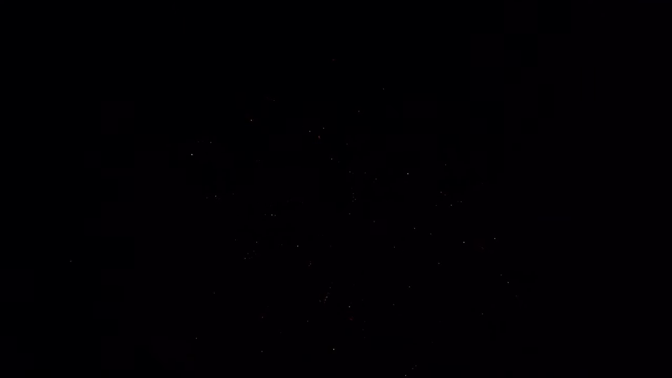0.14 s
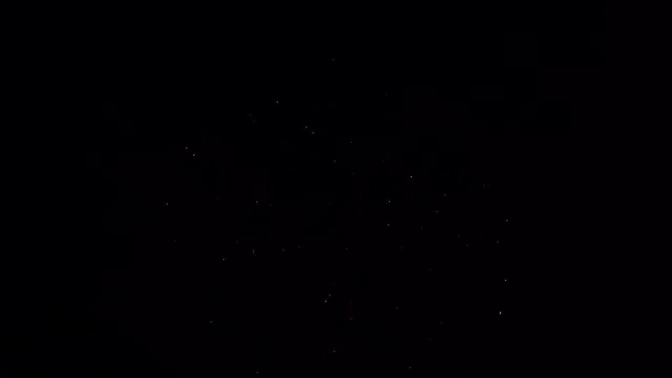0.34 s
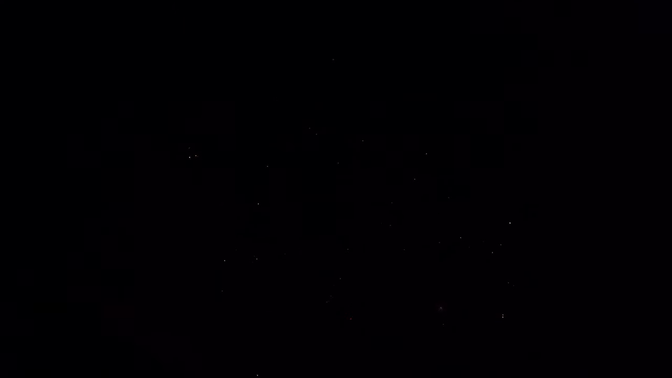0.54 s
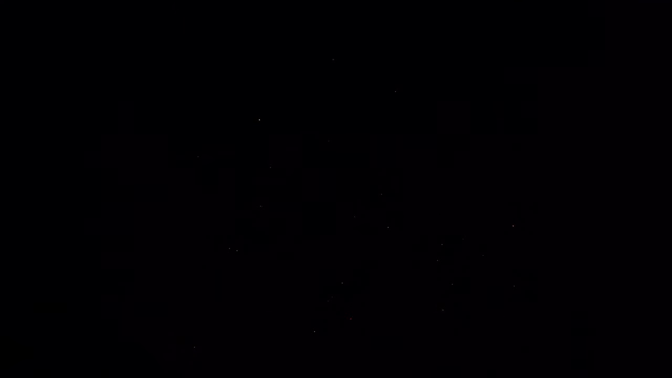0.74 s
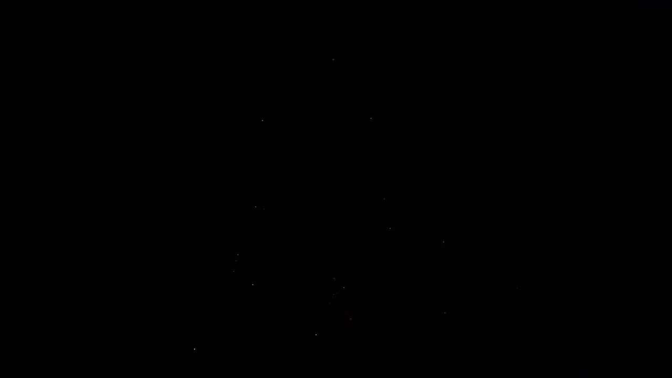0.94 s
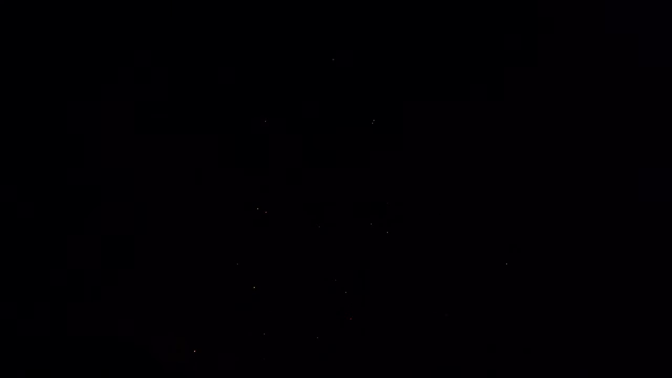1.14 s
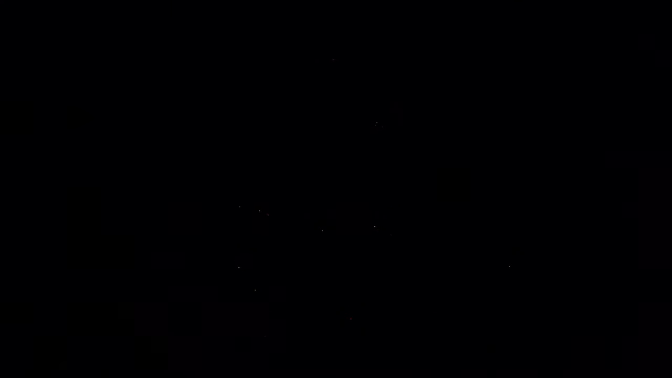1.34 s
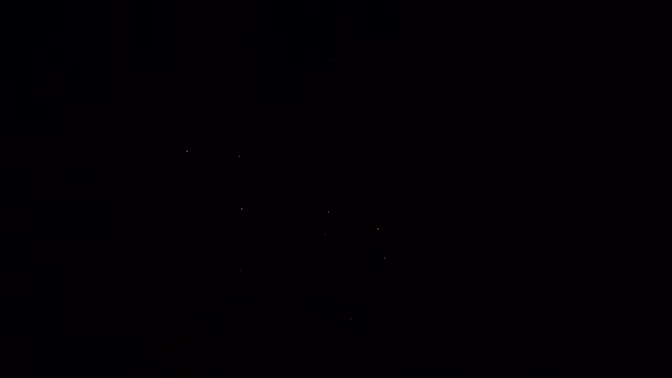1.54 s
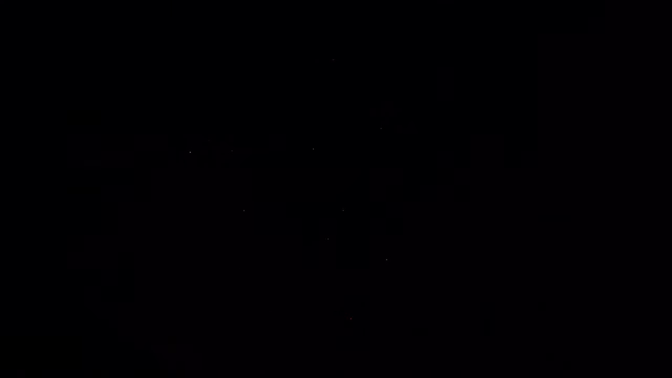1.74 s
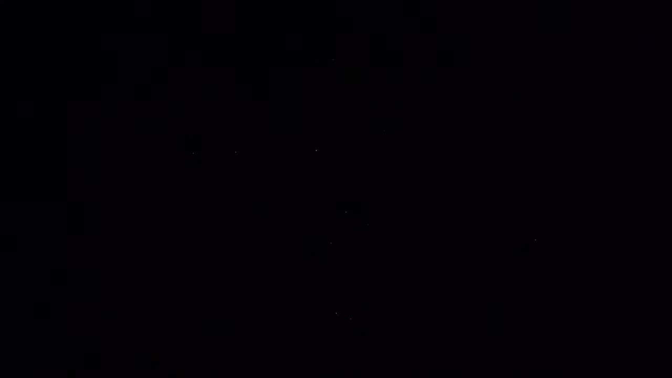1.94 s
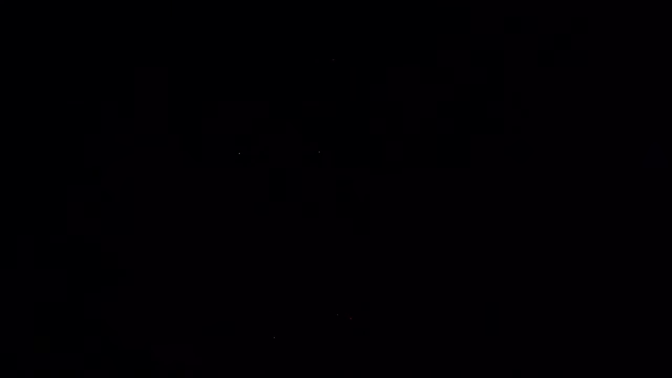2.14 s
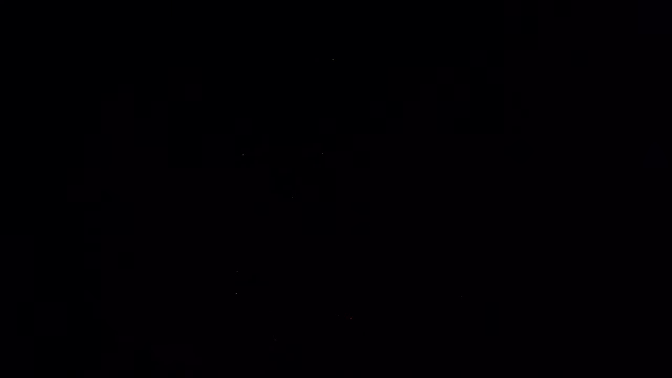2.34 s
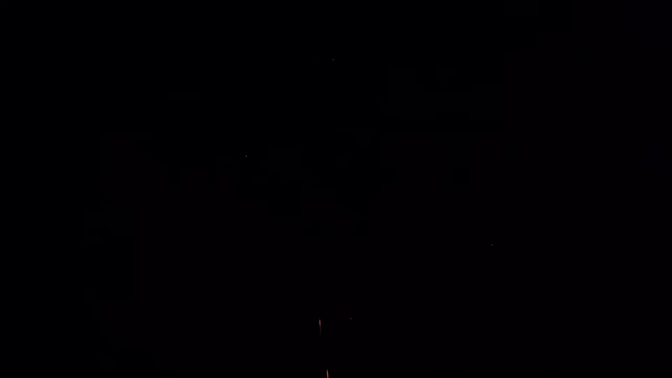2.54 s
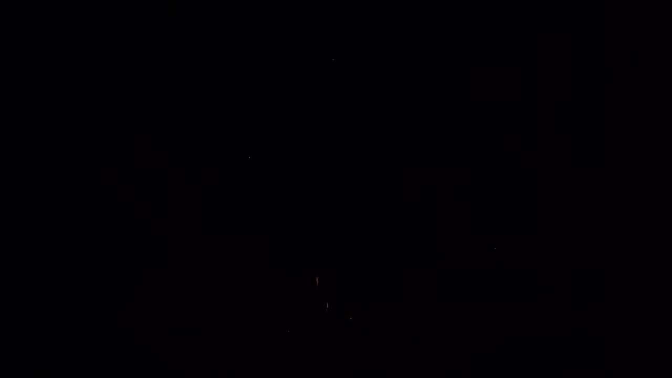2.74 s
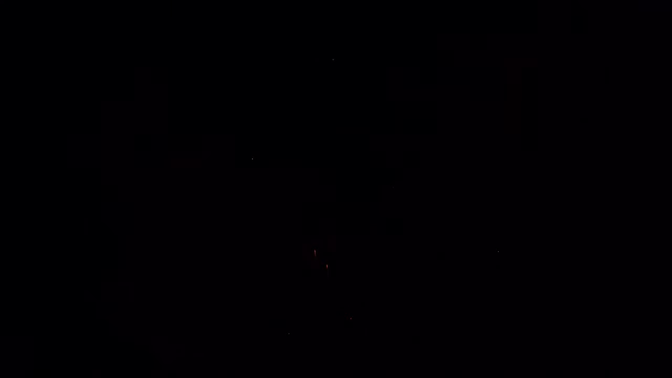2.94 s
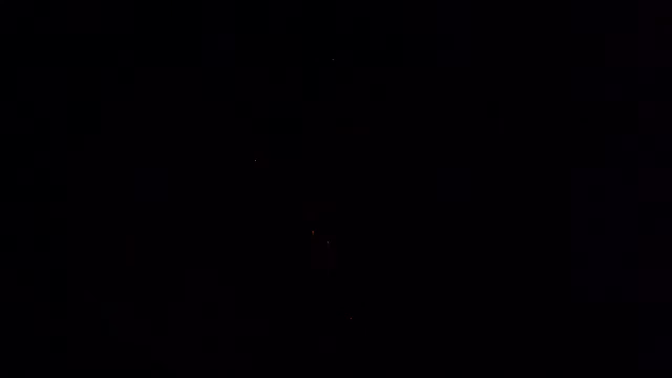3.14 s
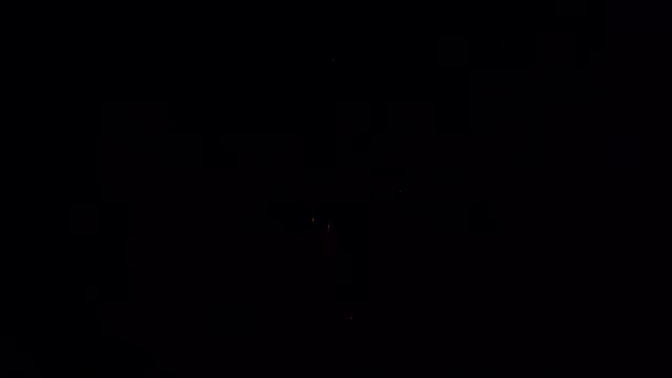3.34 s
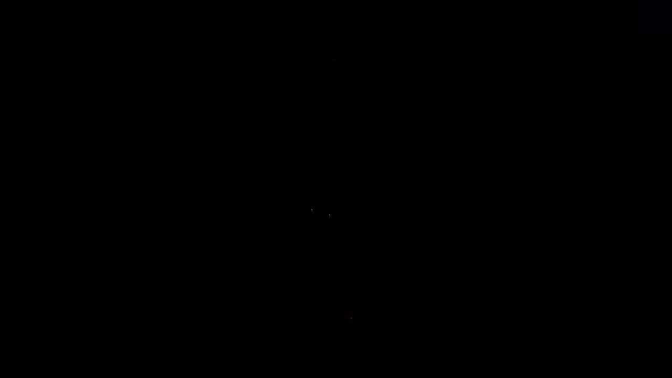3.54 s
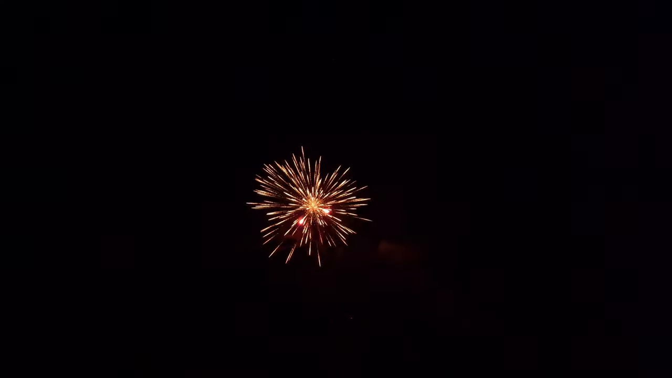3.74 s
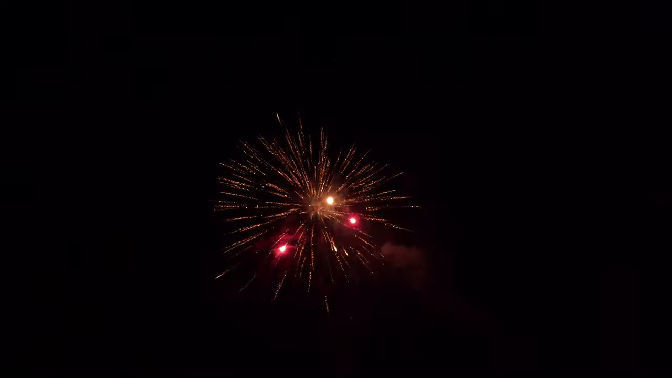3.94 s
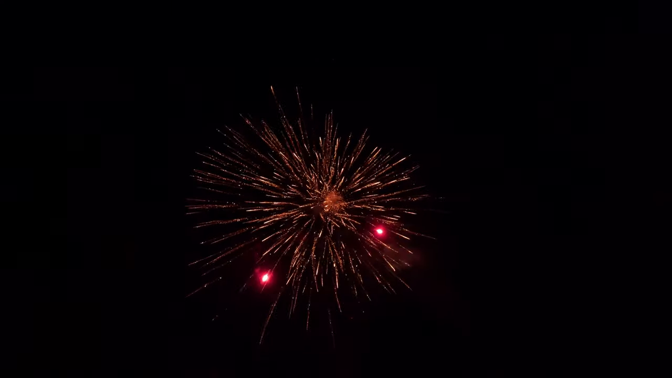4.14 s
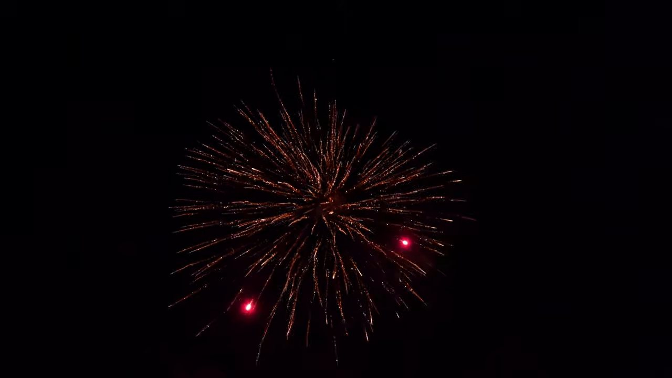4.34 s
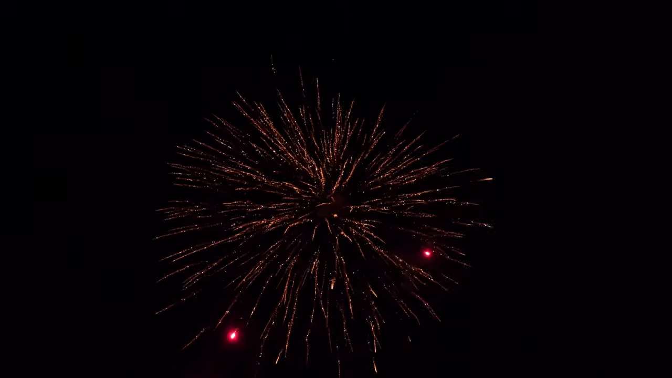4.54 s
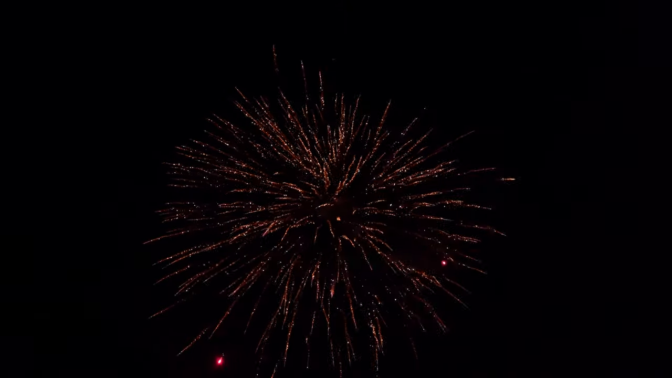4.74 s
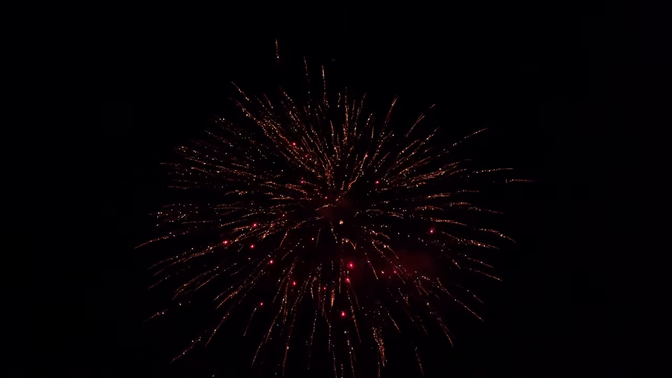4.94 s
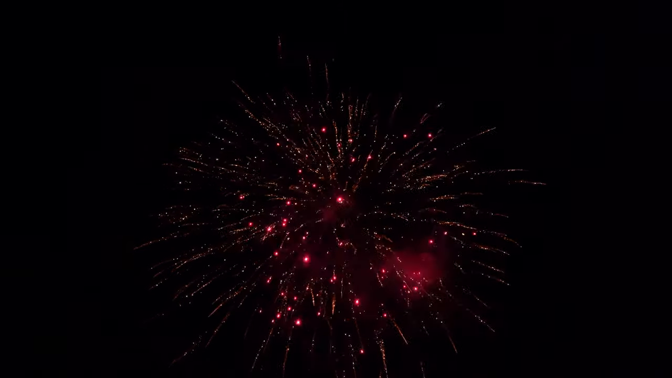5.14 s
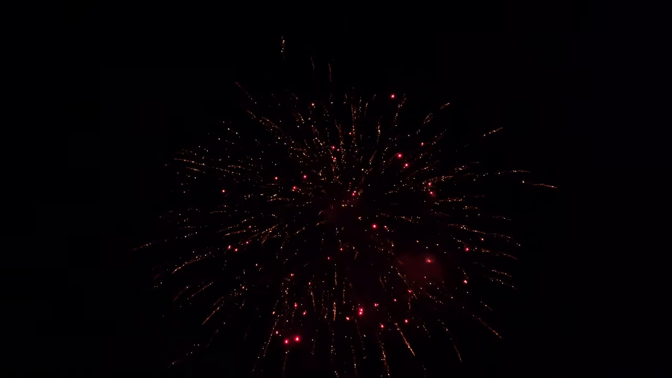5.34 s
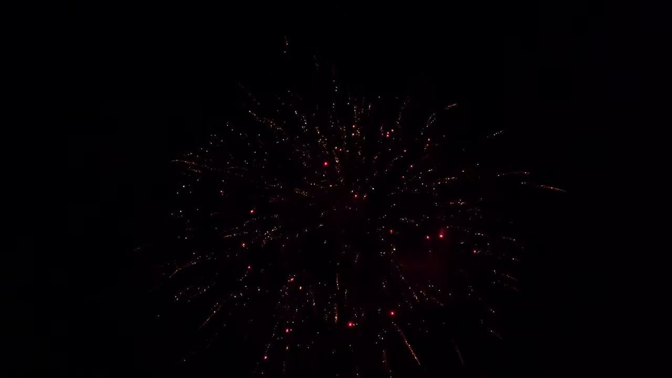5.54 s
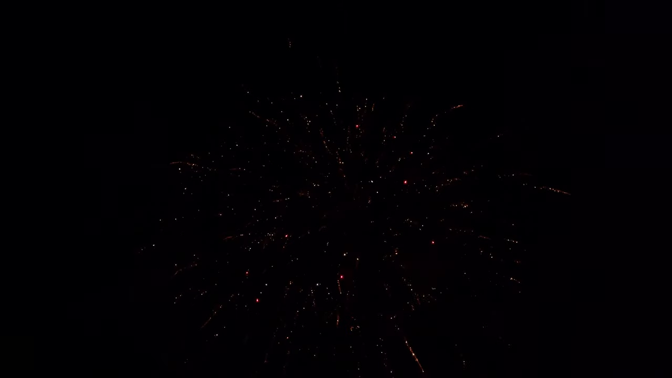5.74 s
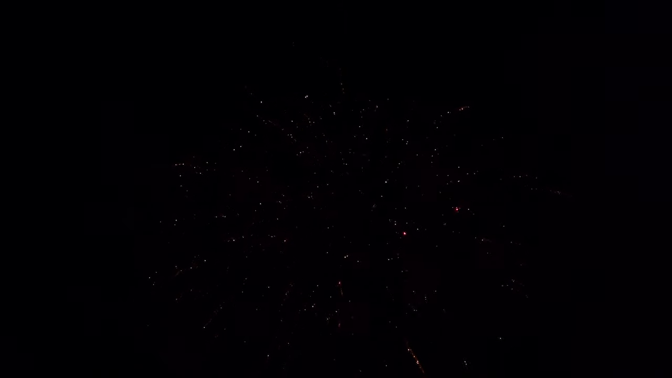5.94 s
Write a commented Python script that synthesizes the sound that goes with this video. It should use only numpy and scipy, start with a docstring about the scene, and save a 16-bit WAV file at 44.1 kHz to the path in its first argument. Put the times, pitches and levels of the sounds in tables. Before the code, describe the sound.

Outdoors at night, low distant rumble, soft air noise, cricket chirps and a rattling frog trill, answered by a slightly lower frog. A nasal fuse snap comes just before two seconds, then a heavy mortar launch and a weaker one. After a tense gap a huge bang cracks overhead, followed by a smaller thump. Echoes roll off the slopes; the microphone overloads on the blasts.

```python
"""Night over open ground: rumble, hum, air noise and insects, then one frog trills and a lower one follows.
Nearly 2 s in a fuse pops, a nasal noise burst; two mortar launches follow and, later, two bursts overhead.
Each blast is shock fronts, a burst of bright flame noise and ringing low modes; slopes return it as banded noise.
That echo rolls on, each band dying at its own rate, and late stars sizzle near the end.
At the microphone a look-ahead limiter and overload squash the blasts; the treble differs a little left to right."""
import sys
import numpy as np
from scipy import signal
from scipy.fft import rfft, irfft
from scipy.io import wavfile
from scipy.ndimage import uniform_filter1d, minimum_filter1d

SR = 44100
rng = np.random.default_rng(int(sys.argv[2]) if len(sys.argv) > 2 else 0)


def to_wav(s):
    """Save 16-bit WAV."""
    ch = np.atleast_2d(s).T  # columns
    pcm = np.round(np.clip(ch, -1, 1) * 32767)  # PCM
    wavfile.write(sys.argv[1], SR, pcm.astype(np.int16))


N = 263574
T = np.arange(N) / SR


def amp(db):
    """Decibels to gain."""
    return 10 ** (np.asarray(db) / 20)


def rms_one(x):
    """Scale to rms 1."""
    return x / np.sqrt(np.mean(x ** 2) + 1e-20)


def at_hz(points, hz):
    """Read the level or decay time of a curve on a log-frequency axis."""
    curve = np.array(points)
    return np.interp(np.log(hz), np.log(curve[:, 0]), curve[:, 1])


def resonate(x, modes):
    """Parallel resonances (f/Hz, width/Hz, level/dB), signs alternating."""
    out = 0
    for k, (hz, width, level_db) in enumerate(modes):
        r = np.exp(-np.pi * width / SR)
        b = [(1 - r * r) / 2, 0, (r * r - 1) / 2]
        a = [1, -2 * r * np.cos(2 * np.pi * hz / SR), r * r]
        out = out + (-1) ** k * amp(level_db) * signal.lfilter(b, a, x)
    return out


def bands():
    """Fifth-octave bands of white noise with their centres; neighbours are unrelated; run in."""
    edges = 22 * 2 ** np.arange(0, 9.7, 1 / 5)
    white = rng.standard_normal((2, N + SR // 4))
    for k, (low, high) in enumerate(zip(edges, edges[1:])):
        band_pass = signal.butter(3, [low, high], "band", fs=SR, output="sos")
        yield np.sqrt(low * high), signal.sosfilt(band_pass, white[k % 2])[-N:]


def drift(per_s, size, step):
    """Slow chance at every step-th sample; spread 1."""
    r = np.exp(-2 * np.pi * per_s * step / SR)
    chance = rng.standard_normal(size + 500)
    return rms_one(signal.lfilter([1], [1, -2 * r, r * r], chance)[500:])


def swell(age, level_db, rise, hold, fall_db_per_s):
    """Rise, hold, then a steady fall in dB."""
    fall_db = fall_db_per_s * np.clip(age - rise - hold, 0, 6)
    return np.clip(age / rise, 0, 1) * amp(level_db - fall_db)


def returns(age, rows):
    """Power of overlapping swells, each after its delay."""
    return sum(swell(age - delay, *shape) ** 2 for delay, *shape in rows)


# the blasts: (t/s, thump level/dB, thump length/s, thump pitch factor, flame crack level/dB, crack length/s,
# echo level/dB, place: 0 = on the ground, 1 = in the sky)
BLASTS = [(2.19, 8.5, 0.03, 0.93, 5, 0.013, -2, 0), (2.399, -4, 0.032, 0.82, -1.5, 0.0084, -3, 0),
          (3.8652, 16, 0.031, .88, -9, 0.0242, 0.5, 1), (4.2092, -1, 0.066, 0.84, -44.5, 0.011, -1.5, 1)]
# low background, earlier and later shells rolling round the hills: (t/s, distant rumble level/dB, hum level/dB)
BACKGROUND = [(0, -23, -37.5), (1, -29, -37.5), (2.1, -32.5, -36.5), (2.8, -35, -33.5), (3.4, -37.5, -40),
              (3.8, -33.5, -36), (4.1, -26, -50), (4.599, -24.5, -34.5), (5.3, -22.5, -43),
              (5.98, -19, -36)]
# late stars sizzle: (t/s, level/dB, rise/s, hold/s, fall/(dB/s))
STARS = (5.17, -61.5, .13, .24, 22)
# how far air noise and hiss sink: [after a launch/dB, after a burst/dB]
AIR_SINK_DB = [15, 16]
HISS_SINK_DB = [10, 17]
AIR_DB, HISS_DB = -42, -63.5
OPENING_DB, OPENING_S = 2.5, 0.62   # both start louder, under the last echo of an earlier shell
SINK_S, SUNK_S, RETURN_S = .3, .72, .45   # time going down, staying down, coming back


def night(t):
    """Powers of distant rumble, hum, air noise and hiss at times t; the last two sink after each blast."""
    s, rumble_db, hum_db = np.transpose(BACKGROUND)
    starts = np.array([blast[0] for blast in BLASTS])[:, None]
    sky = np.array([round(blast[-1]) for blast in BLASTS])[:, None]
    since = t - starts
    sunk = np.clip(np.minimum(since / SINK_S, 1 - (since - SINK_S - SUNK_S) / RETURN_S), 0, 1)
    opening_db = OPENING_DB * np.clip(1 - t / OPENING_S, 0, 1)
    air_db = AIR_DB + opening_db - (np.array(AIR_SINK_DB)[sky] * sunk).max(axis=0)
    hiss_db = HISS_DB + opening_db - (np.array(HISS_SINK_DB)[sky] * sunk).max(axis=0)
    levels_db = [np.interp(t, s, rumble_db), np.interp(t, s, hum_db), air_db, hiss_db]
    rumble, hum, air, hiss = amp(2 * np.array(levels_db))
    return rumble, hum, air, hiss + returns(t, [STARS])


# relative spectra of the night's layers: (f/Hz, level/dB per Hz)
RUMBLE_COLOUR = [(41, -47), (70, -13.5), (102, -3.5), (200, 3), (305, 1), (446, -8.5), (679, -8),
                 (792, -15.5), (951, -12.5), (2000, -35), (2600, -40), (4400, -120)]
HUM_COLOUR = [(13, -43), (22, -13), (38, -12.5), (54, -1.5), (86, 2.5), (110, -2.5), (140, -23),
              (240, -120)]
AIR_COLOUR = [(300, -19), (500, -18), (800, -4.5), (1200, -1.5), (2000, -2), (2800, -7), (4000, -16.5),
              (6000, -25.5), (9000, -57)]
HISS_COLOUR = [(3000, -21), (5500, -3), (8000, -4.5), (12000, -9.5), (15500, -14), (16300, -19)]
# relative spectra of the echo of a launch and of a burst: (f/Hz, level/dB per Hz)
GROUND_COLOUR = [(24, -41), (40, -33), (60, -29), (167, 6.5), (269, -2), (433, -33.5), (529, -8.5),
                 (630, -18.5), (790, -13.5), (1040, -17), (1180, -16), (2440, -11.5), (12800, -47.5),
                 (16000, -53)]
SKY_COLOUR = [(24, -77), (40, -45.5), (69, -31), (91, -6), (237, 0), (290, 3.5), (329, 0.5), (479, -11.5),
              (1070, -18), (1210, -20), (2500, -16), (7170, -40.5), (11000, -46.5), (16000, -59)]
# returns from near walls, slopes and far hills: (delay/s, level/dB, rise/s, hold/s, fall/(dB/s))
GROUND_ECHO = [(.012, 11, 0.009, 0.011, 904), (.042, -0.5, 0.017, .01, 60), (.08, 2, .03, .03, 44),
               (.33, -0.5, 0.13, 0.1, -1.5)]
SKY_ECHO = [(.001, 6.5, 0.012, 0.016, 520), (.03, 0.5, 0.0063, 0.013, 140), (0.0616, 3, 0.0022, .05, 26),
            (.24, 0.9, 0.18, 0.25, 0.75)]
# further decay of the echo, band by band: (f/Hz, time to lose 60 dB/s)
GROUND_T60 = [(60, 6.5), (200, 0.63), (500, 4.8), (1000, 6.5), (2500, 2.99), (5000, 1.87), (9000, 1.45),
              (15000, 1.2)]
SKY_T60 = [(60, 0.69), (300, 1.17), (1000, 15), (2500, 4.9), (4500, 2.5), (6500, 2.24), (9000, 1.52),
           (15000, 1.2)]
ECHO_DB = -16   # added to every return
ROLL_DB, ROLL_PER_S = .6, 9   # uneven terrain makes the echo roll


def echoes_and_night():
    """Countless far reflections blur into noise; each band dies at its own rate over the background."""
    step = 32
    coarse = T[::step]
    bank, background = list(bands()), night(coarse)
    heard = [returns(coarse - s, SKY_ECHO if sky else GROUND_ECHO) for s, *_, sky in BLASTS]
    layers = (GROUND_COLOUR, SKY_COLOUR, RUMBLE_COLOUR, HUM_COLOUR, AIR_COLOUR, HISS_COLOUR)
    totals = [sum(amp(2 * at_hz(colour, hz)) * np.var(band) for hz, band in bank) for colour in layers]
    out, shared_roll = np.zeros(N), drift(ROLL_PER_S, len(coarse), step)
    for hz, band in bank:
        roll_db = ROLL_DB * (shared_roll + .6 * drift(ROLL_PER_S, len(coarse), step))
        shares = [amp(2 * at_hz(colour, hz)) / total for colour, total in zip(layers, totals)]
        power = sum(share * level for share, level in zip(shares[2:], background))
        for (s, *_, echo_db, sky), returned in zip(BLASTS, heard):
            age = np.maximum(coarse - s, 0)
            loss_db = 60 * age / at_hz(SKY_T60 if sky else GROUND_T60, hz)
            power += shares[round(sky)] * returned * amp(2 * (ECHO_DB + echo_db + roll_db - loss_db))
        out += band * np.interp(T, coarse, np.sqrt(power))
    return out


def katydid():
    """A faint, far insect buzz, twice-resonated noise, that soon fades."""
    buzz = [(5700, 450, 0)]   # f/Hz, width/Hz, level/dB
    tone = rms_one(resonate(resonate(rng.standard_normal(N), buzz), buzz))
    return swell(T, level_db=-66, rise=0.011, hold=.6, fall_db_per_s=25) * tone


# cricket chirps: (t/s, level/dB)
CHIRPS = [(.094, -54), (.479, -54), (.884, -54), (1.267, -52.5), (1.64, -53), (3.62, -58)]
# wing strokes of a chirp: (delay/s, level/dB re chirp)
STROKES = [(0, 0), (0.044, 2), (.1, 0.5)]
STROKE_S, STROKE_FROM_HZ, STROKE_TO_HZ = .024, 4950, 4380


def cricket():
    """Each wing stroke is a short, slightly rough tone falling in pitch, with a soft echo."""
    out, n = np.zeros(N), int(STROKE_S * SR)
    cycles = np.cumsum(np.linspace(STROKE_FROM_HZ, STROKE_TO_HZ, n)) / SR
    stroke = np.hanning(n) ** 0.41 * np.sin(2 * np.pi * cycles)
    for s, chirp_db in CHIRPS:
        for delay, stroke_db in STROKES:
            out[round((s + delay) * SR):][:n] += amp(chirp_db + stroke_db) * stroke
    out *= 1 + .25 * rms_one(uniform_filter1d(rng.standard_normal(N), size=90))   # roughness
    return out + amp(-5) * np.roll(out, int(0.017 * SR))


# frog trills, one a frog: (t/s, level/dB, rise/s, hold/s, throb depth 0-1)
TRILLS = [(0.102, -31, 0.013, 0.53, 0.61), (1.474, -33, .11, .42, 0.34)]
# vocal sacs of the first and second frog, each a list of (f/Hz, width/Hz, level/dB)
FROG_SACS = [
    [(2230, 260, 0), (1100, 250, -14)],
    [(2150, 255, 0), (1100, 250, -10)],
]
FROG_PULSE_HZ = 302   # mean rate; each pulse wavers in time and strength
THROBS_PER_S, THROB_SLOWING_PER_S2, FIRST_THROB_S = 24.3, 6, .03
TRILL_END_DB_PER_S, TRILL_ECHO_DB, TRILL_ECHO_FALL_DB_PER_S = 400, -8.5, 32.5


def frog():
    """Throat pulses ring the vocal sac in throbs that slow down; a second frog answers a little lower."""
    waver = 1.7 * uniform_filter1d(rng.standard_normal(N), size=100)
    cycles = np.cumsum(FROG_PULSE_HZ * (1 + waver)) / SR
    pulses = np.diff(np.floor(cycles), prepend=0) * amp(1.5 * rng.standard_normal(N))
    pulses = pulses + .02 * rng.standard_normal(N)   # a little breath noise
    out = 0
    for (s, level_db, rise, hold, depth), sac in zip(TRILLS, FROG_SACS):
        age = T - s
        since = np.clip(age - FIRST_THROB_S, -1, 1)
        throb_cycles = since * (THROBS_PER_S - THROB_SLOWING_PER_S2 * since / 2)
        throb = np.clip(.5 + 6.6 * np.cos(2 * np.pi * throb_cycles), 0, 1)
        call = swell(age, level_db, rise, hold, TRILL_END_DB_PER_S) * (1 - np.clip(depth, 0, 1) * (1 - throb))
        echo = swell(age - rise - hold, level_db + TRILL_ECHO_DB, .03, 0.0092, TRILL_ECHO_FALL_DB_PER_S)
        out = out + np.hypot(call, echo) * rms_one(resonate(resonate(pulses, sac), sac))
    return out


# the fuse pop, its near echo, their smear and a late soft return: (delay/s, level/dB, rise/s, hold/s, fall/(dB/s))
POP = [(0, -7.5, 0.00056, 0.0015, 1600), (.009, -15, 0.0065, 0.0048, 1300), (0.018, -26, .008, .003, 600),
       (0.051, -36, .045, .005, 250), (.1, -44, 0.027, 0.13, 905)]
# nasal ring of the pop: (f/Hz, width/Hz, level/dB)
POP_RING = [(576, 630, -13.5), (1310, 560, -11.5), (2130, 660, -3), (3060, 580, 4), (3390, 484, 3),
            (5300, 1700, -28.5), (11000, 7000, -47.5)]
POP_S = 1.9252


def fuse_pop():
    """A small charge snaps: a nasal burst of noise."""
    return np.sqrt(returns(T - POP_S, POP)) * rms_one(resonate(rng.standard_normal(N), POP_RING))


# colour of the flame noise: (f/Hz, width/Hz, level/dB)
CRACK_COLOUR = [(1880, 1350, 3), (2950, 1330, 4.5), (5840, 6500, -11.5), (10300, 11000, -21.5)]
# the crack returns smeared off the nearest trees
CRACK_ECHO_S, CRACK_ECHO_DB, CRACK_ECHO_FALL_DB_PER_S = 0.022, -23.5, 500


def cracks():
    """Flame roar of each blast: a short burst of bright noise that stops abruptly, then its near echo."""
    gate = np.full(N, 1e-9)
    for s, *_, crack_db, length, _, _ in BLASTS:
        age, late = T - s, T - s - CRACK_ECHO_S
        ending_db = -18000 * np.clip(age - length, 0, 1)
        gate += amp(crack_db + ending_db) * np.clip(age / 0.0059, 0, 1) ** 2
        echo_fall_db = CRACK_ECHO_FALL_DB_PER_S * np.clip(late, 0, 1)
        gate += amp(crack_db + CRACK_ECHO_DB - echo_fall_db) * np.clip(late / 0.0094, 0, 1)
    return gate * rms_one(resonate(rng.standard_normal(N), CRACK_COLOUR))


# low modes between ground and walls, before each blast's pitch factor: (f/Hz, level/dB re thump, t60/s)
THUMP_MODES = [(54.6, -5.5, 0.096), (129, 6, 0.053), (192.8, 4, 0.085), (295.2, -2, 0.12),
               (401, -9.5, 0.087), (537, -8, 0.076), (751, -22.5, 0.14)]
# delay of the thump behind the blast time: [on the ground/s, in the sky/s]
THUMP_LAG_S = [0.0094, 0.00106]
GLIDE_S, GLIDE_FADE_S = 0.00316, 0.0015   # the first swing runs fast while the gas cloud is small
SWELL_HZ, SWELL_DB, SWELL_T60_S = 7.7, -38, 0.68   # slow pressure swing that outlasts the thump


def thumps():
    """The push of gas rings low until the near reflections end; each blast stirs the modes differently."""
    out = np.zeros(N)
    stir_db = 1.3 * rng.standard_normal((len(BLASTS), len(THUMP_MODES)))
    for (s, thump_db, length, pitch, *_, sky), stir in zip(BLASTS, stir_db):
        age = np.clip(T - s - THUMP_LAG_S[round(sky)], 0, 1)
        swing = age + GLIDE_S * (1 - np.exp(-age / GLIDE_FADE_S))
        ending_db = -2500 * np.maximum(age - length, 0)
        for (hz, mode_db, t60), own_db in zip(THUMP_MODES, stir):
            level = amp(thump_db + mode_db + own_db + ending_db - 60 * age / t60)
            out += level * np.sin(2 * np.pi * hz * pitch * swing)
        swell_level = amp(thump_db + SWELL_DB - 60 * age / SWELL_T60_S)
        out += swell_level * np.sin(2 * np.pi * SWELL_HZ * age) * (age < 1)
    return out


# fronts of every blast, direct and off near surfaces: (delay/s, level/dB re thump, length/ms)
GROUND_FRONTS = [(.0088, -5, 0.41), (.0126, -1.5, 0.56), (.024, -16.5, .3)]
SKY_FRONTS = [(.001, -3, 0.37), (.0038, 6.5, .6), (.0092, 4.5, .34), (.0168, -6, .5), (.0648, -20, 0.97)]
# lone clicks, the front of the fuse pop and one faint tick: (t/s, level/dB before blunting, length/ms)
CLICKS = [(1.9263, -11, .22), (3.094, -39, .1)]
# air blunts a front, low-pass corner: [from the ground/Hz, from the sky/Hz]
FRONT_CUT_HZ = [19000, 8600]


def shocks():
    """N-shaped pressure fronts: a jump, a straight fall to suction, a jump back, blunted by the air."""
    out = np.zeros((2, N))   # ground, sky
    fronts = [(*click, 0) for click in CLICKS]
    for s, thump_db, *_, sky in BLASTS:
        for delay, front_db, ms in (SKY_FRONTS if sky else GROUND_FRONTS):
            fronts.append((s + delay, thump_db + front_db, ms, round(sky)))
    for s, level_db, ms, sky in fronts:
        n = max(int(ms * SR / 1000), 2)
        out[sky, round(s * SR):][:n] += amp(level_db) * np.linspace(1, -1, n)
    return sum(signal.lfilter(*signal.butter(1, min(hz, .45 * SR), fs=SR), x + 1e-18)
               for x, hz in zip(out, FRONT_CUT_HZ))


def scene():
    """Everything reaches one microphone spot; both channels start alike."""
    background = echoes_and_night() + katydid() + cricket() + frog()
    mono = background + fuse_pop() + cracks() + thumps() + shocks()
    return np.array([mono, mono])


# left-right difference at full level: (f/Hz, side minus mid level/dB)
SIDE_LEVEL = [(500, -45), (2000, -40), (4000, -20.5), (8000, -13.5), (14000, -12)]
LIMIT_DB, LIMIT_SHARE = 3, 0.44   # the limiter takes off this share of the dB above the limit
AHEAD_S, ATTACK_S = 0.025, 0.0046
RELEASE_DB_PER_S = 597   # fall of the held overshoot, before the share is taken
CUTOFF_HZ = 16600


def record(dry):
    """Look-ahead limiter, overload, a trace of left-right difference in the treble, top cut."""
    over_db = np.maximum(20 * np.log10(np.abs(dry[0]) + 1e-9) - LIMIT_DB, 0)
    release_db = RELEASE_DB_PER_S * T
    held_db = np.maximum.accumulate(over_db + release_db) - release_db   # lets go gradually
    span = int(AHEAD_S * SR)
    ahead_db = -minimum_filter1d(-held_db, size=span, origin=-(span // 2))   # ducks before the peak arrives
    r = np.exp(-1 / (ATTACK_S * SR))
    smooth_db = signal.lfilter([1 - r], [1, -r], ahead_db)
    squashed = dry[0] * amp(-LIMIT_SHARE * smooth_db)
    mid = squashed / (1 + np.abs(squashed / .96) ** 4) ** (1 / 4)   # firm overload
    hz = np.fft.rfftfreq(N, 1 / SR) + 1
    turn = uniform_filter1d(rng.standard_normal(N), size=200)   # the difference keeps changing sign
    loud = np.clip(0.66 * np.sqrt(uniform_filter1d(mid ** 2, size=900) + 1e-9), .12, 1)   # it grows with level
    side = irfft(rfft(mid * rms_one(turn) * loud) * amp(at_hz(SIDE_LEVEL, hz)), N)
    top_cut = signal.cheby2(24, 95, CUTOFF_HZ, fs=SR, output="sos")
    return signal.sosfilt(top_cut, [mid + side, mid - side])


dry = scene()
out = record(dry)
to_wav(out)
```